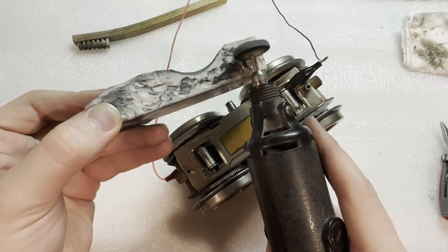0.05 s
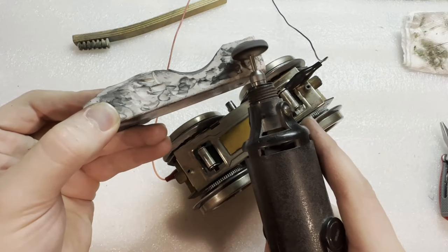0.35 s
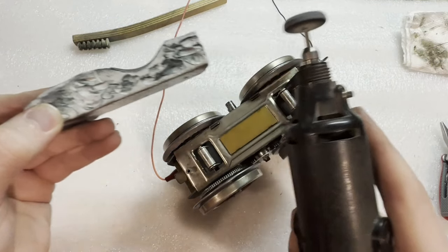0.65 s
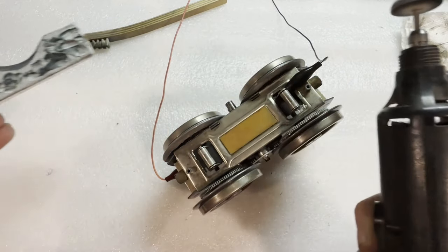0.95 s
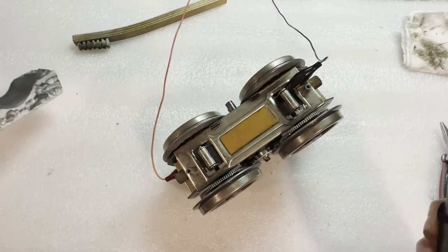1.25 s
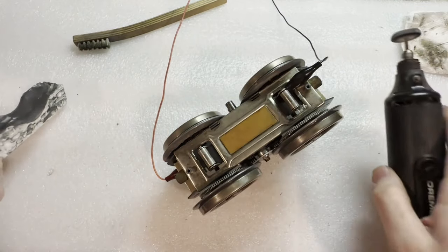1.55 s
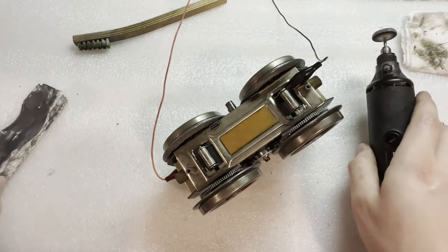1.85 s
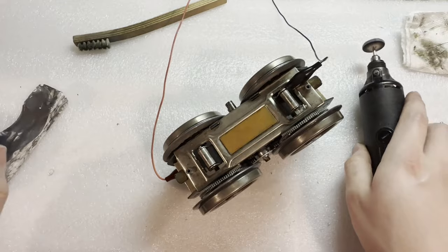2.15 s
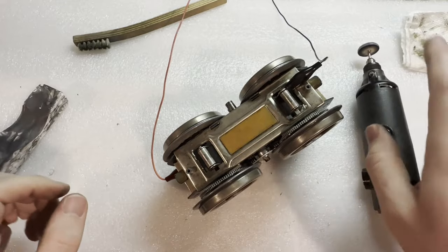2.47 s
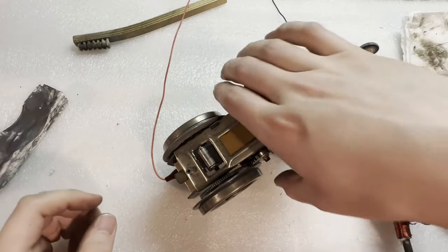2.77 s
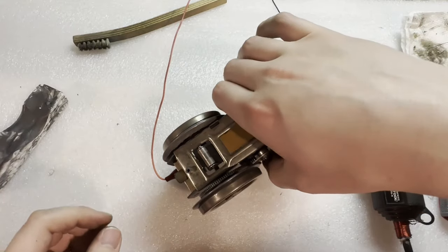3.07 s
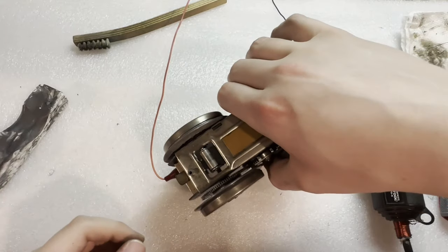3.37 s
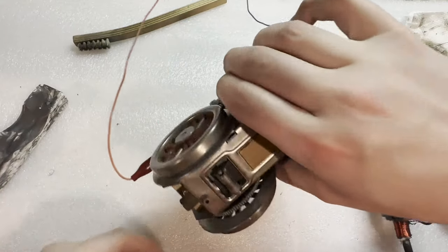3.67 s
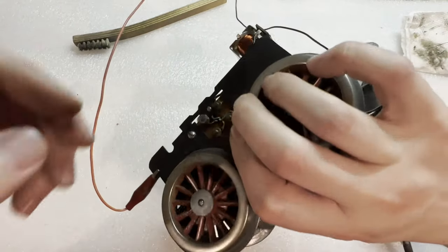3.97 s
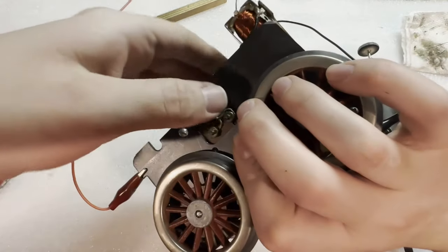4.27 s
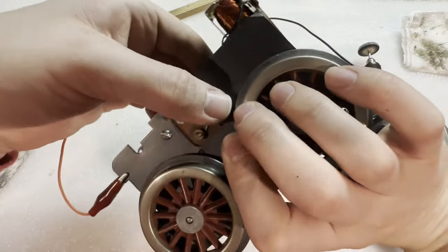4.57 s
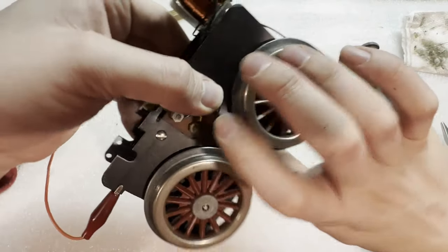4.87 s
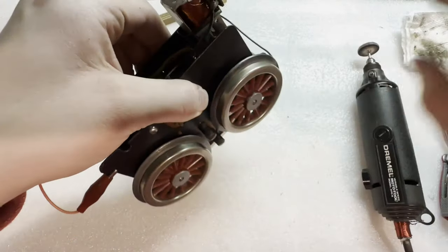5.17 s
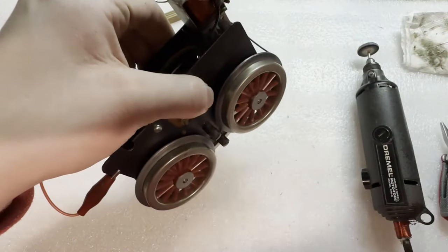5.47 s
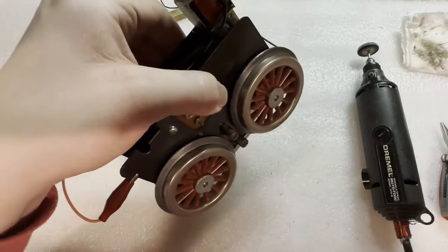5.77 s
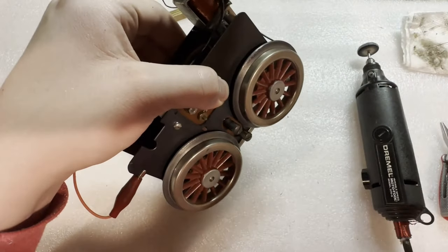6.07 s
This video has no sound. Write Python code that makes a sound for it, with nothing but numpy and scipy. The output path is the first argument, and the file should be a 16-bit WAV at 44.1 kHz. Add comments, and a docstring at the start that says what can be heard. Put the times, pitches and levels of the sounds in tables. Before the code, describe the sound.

A rotary tool buffs a part with a rattling, hissing whine, rising in pitch at 0.4 seconds as it lifts free. It is switched off at 0.6 seconds and winds down by about 1.3, with a sharp click at 0.7 and a hollow plastic clack at 0.9. The tool bumps the bench lightly at 1.4 seconds, is laid down at 1.8 and drags faintly over foam. From 2.7 seconds a metal model chassis slides softly, with a flurry of small clicks around 3.3, then quiet finger rubs, tiny squeaks and ticks. At 4.8 and 4.9 seconds its wheels and rods snap sharply, the loudest moments, leaving a thin, brief ping. A flicked wheel hisses faintly just after 5 seconds. Dull wooden knocks follow, the strongest at 5.8, and a last click comes at 6.1. Everything is close, in a small room with faint air and a thin electrical whistle.

```python
"""A foam-covered workbench in a small room, one close microphone. A rotary tool buffs a part, races as
the wheel lifts free, is switched off and coasts to rest: a shock each turn gives harmonics, fan and
armature add tones, brushes and wheel hiss. Its shell clacks and it is laid down. A metal model chassis
is slid, lifted and turned (stick-slip noise); its wheels and rods click and snap (struck modes), and
one wheel is flicked. A few dull wooden knocks sound over room air and a thin electrical whistle."""
import sys
import numpy as np
from scipy import signal
from scipy.fft import rfft, irfft
from scipy.io import wavfile

SR = 44100
rng = np.random.default_rng(int(sys.argv[2]) if len(sys.argv) > 2 else 0)


def wrap_up_sound(samples):
    """Save the sound to the file named by the first command line argument, as 16-bit audio."""
    columns = np.atleast_2d(samples).T
    # keep every value between -1 and 1, then stretch to whole-number steps
    tamed = np.clip(columns, -1, 1)
    steps = np.round(tamed * 32767).astype(np.int16)
    wavfile.write(sys.argv[1], SR, steps)


N = 274302
TIME_S = np.arange(N) / SR
AFTER_S = TIME_S[:SR // 2]   # time since a blow
BINS_HZ = np.arange(N // 2 + 1) * SR / N
CUTOFF_HZ = 15900


def from_db(db):
    return 10 ** (np.asarray(db) / 20)


def unit_rms(x):
    return x / np.sqrt(np.mean(x ** 2) + 1e-20)


def spectrum_db(points, hz):
    """Spectrum level, interpolated over log frequency."""
    points_hz, db = np.transpose(points)
    return np.interp(np.log(np.maximum(hz, 1)), np.log(points_hz), db)


def swell_db(resonances, hz):
    """Summed gain of bell-shaped resonances."""
    return sum(db / (1 + (2 * (hz - centre_hz) / width_hz) ** 2)
               for centre_hz, width_hz, db in resonances)


def colour(x, spectrum, resonances=()):
    """Shape by a spectrum plus resonances; rms 1."""
    gain = from_db(spectrum_db(spectrum, BINS_HZ) + swell_db(resonances, BINS_HZ))
    return unit_rms(irfft(rfft(x) * gain, N))


def butter(x, hz, kind, order=2):
    """Causal low- or high-pass."""
    sections = signal.butter(order, np.clip(hz, 10, .45 * SR), kind, fs=SR, output="sos")
    return signal.sosfilt(sections, x)


def drift(hz):
    """Low-passed random wander; rms 1."""
    return unit_rms(butter(rng.standard_normal(N + SR), hz, "low")[SR:])


def resonate(x, hz, width_hz):
    """Two-pole resonator."""
    r = np.exp(-np.pi * width_hz / SR)
    return signal.lfilter([1, 0, -1], [1, -(1 + r * r) * np.cos(2 * np.pi * hz / SR), r * r], x)


def narrow_band(x, hz, width_hz):
    """Two equal resonators in series; rms 1."""
    return unit_rms(resonate(resonate(x, hz, width_hz), hz, width_hz))


def dying_noise(t60_s):
    """Decaying noise burst; energy 1."""
    x = rng.standard_normal(len(AFTER_S)) * from_db(-60 * AFTER_S / t60_s)
    return x / np.sqrt(np.sum(x ** 2))


def contact(chatter_db, t60_s):
    """One sharp push, then brief surface chatter."""
    return (AFTER_S == 0) + from_db(chatter_db) * dying_noise(t60_s)


def struck(modes, push, vary_db=1.0):
    """Damped modes; each blow divides a little differently among them."""
    ring = np.zeros(len(AFTER_S))
    for k, (hz, db, t60_s) in enumerate(modes):
        envelope = from_db(db + vary_db * rng.standard_normal() - 60 * AFTER_S / t60_s)
        ring += (-1) ** k * envelope * np.sin(2 * np.pi * hz * AFTER_S)
    return signal.fftconvolve(push, ring)[:len(AFTER_S)]


def place(out, start_s, peak_db, sound):
    """Add a blow at its time and peak level."""
    start = int(start_s * SR)
    out[start:start + len(sound)] += (from_db(peak_db) * sound / np.abs(sound).max())[:N - start]


def in_room(x, wet_db, wall_hz, t60_s=.21):
    """Direct sound plus a short, duller tail from bench and walls."""
    tail = butter(dying_noise(t60_s) * (AFTER_S > .003), wall_hz, "low", order=1)
    return x + from_db(wet_db) * signal.fftconvolve(x, tail)[:N]


def thuds(blows, clusters, chatter_db=3.0):
    """Blows ring clusters of close modes; soft contacts lose treble, glancing ones bass."""
    out = np.zeros(N)
    for start_s, peak_db, lowpass_hz, highpass_hz in blows:
        ring = np.zeros(len(AFTER_S))
        for hz, width_hz, share_db, t60_s in clusters:
            cluster = resonate(contact(chatter_db, t60_s), hz, width_hz)
            ring += from_db(share_db) * unit_rms(resonate(cluster, hz, width_hz=hz))
        softened = butter(butter(ring, lowpass_hz, "low", order=1), 3 * lowpass_hz, "low")
        place(out, start_s, peak_db, butter(softened, highpass_hz, "high"))
    return out


def friction(strokes, spectrum, attack_s, release_s, grain_db, grain_hz, resonances=(), treble_hz=7000):
    """Clumps of tiny slips stir any resonances; a stroke takes hold, grows or fades, then dies away."""
    slips = colour(rng.standard_normal(N) * from_db(grain_db * drift(grain_hz) + drift(21)), spectrum)
    ringing = np.zeros(N)
    for peak in resonances:
        excess = from_db(swell_db([peak], BINS_HZ)) - 1
        ringing += irfft(rfft(slips) * excess, N) * from_db(3 * drift(9))
    rub = unit_rms(slips + ringing)
    body = irfft(rfft(rub) / (1 + (BINS_HZ / treble_hz) ** 4), N)
    out = np.zeros(N)
    for start_s, length_s, db, growth_db, treble_db in strokes:
        age_s = TIME_S - start_s
        pressure = from_db(db + growth_db * (np.clip(age_s / length_s, 0, 1) - .5))
        envelope = np.clip(age_s / attack_s, 0, 1) * np.exp(-np.maximum(age_s - length_s, 0) / release_s)
        texture = body + from_db(treble_db) * (rub - body)
        out += pressure * envelope * np.roll(texture, rng.integers(N))
    return out


# room air: f/Hz, density/dB
AIR_SPECTRUM = [(15, -62.5), (25, -37), (82, -3.5), (166, -16), (236, -6.5), (285, -12.5), (317, -18),
                (624, -23), (677, -21), (863, -25), (988, -23), (5730, -28), (7710, -33.5), (9070, -31.5),
                (16000, -45)]


def background(air_db=-72, whistle_db=-81, throb_hz=60):
    """Room air and a thin, throbbing electrical whistle."""
    throb = (1 + np.cos(2 * np.pi * throb_hz * TIME_S)) ** 2 + .4
    whistle = narrow_band(throb * rng.standard_normal(N), hz=7830, width_hz=400)
    air = colour(rng.standard_normal(N), AIR_SPECTRUM)
    return from_db(air_db) * air + from_db(whistle_db) * whistle


# rumble: t/s, length/s, level/dB, growth/dB, treble/dB
RUMBLE_STROKES = [(5.0, 1.5, -68, -3.5, -4)]
# rumble: f/Hz, density/dB
RUMBLE_SPECTRUM = [(50, -20), (100, -3.5), (250, 4.5), (500, -10), (900, -10), (1800, -11), (5000, -72)]


def rumble():
    """Soft, uneven low noise while the chassis is held up."""
    return friction(RUMBLE_STROKES, RUMBLE_SPECTRUM, attack_s=.024, release_s=.1, grain_db=4, grain_hz=60)


# knocks: t/s, peak/dB, low-pass/Hz, high-pass/Hz
KNOCKS = [(2.374, -47, 700, 850), (3.859, -51, 1520, 328), (5.099, -54.5, 1500, 700),
          (5.306, -44.5, 710, 200), (5.416, -46, 695, 397), (5.478, -36.5, 2520, 604),
          (5.493, -41.5, 2485, 690), (5.654, -49.5, 350, 120), (5.744, -53.5, 409, 150),
          (5.791, -38, 700, 500), (5.8, -26, 2000, 350), (5.805, -28, 500, 150), (5.822, -34, 1620, 150),
          (5.868, -47.5, 500, 298), (5.895, -47.5, 406, 150), (5.965, -53, 593, 150),
          (6.063, -53.5, 500, 150), (6.175, -56.5, 903, 150)]
# wood mode clusters: f/Hz, width/Hz, level/dB, t60/s
WOOD_CLUSTERS = [(84, 72, -5.5, 0.1), (265, 32, 4.5, 0.046), (364, 48, -1.5, 0.048), (469, 68, 0.5, 0.033),
                 (690, 120, -8.5, 0.055), (880, 59, -2.5, 0.054), (1244, 510, -2.5, 0.063),
                 (2000, 2500, -11, 0.23), (3320, 12000, -3, 0.19)]


def wood_knocks():
    """Struck wood rings dully into the room."""
    return in_room(thuds(KNOCKS, WOOD_CLUSTERS), wet_db=-1.5, wall_hz=4000)


# bumps: t/s, peak/dB, low-pass/Hz, high-pass/Hz
BUMPS = [(1.384, -43.5, 3030, 203), (1.392, -50, 198, 40), (1.7685, -25, 3500, 256),
         (1.777, -27.5, 300, 40), (1.792, -38, 2000, 100), (1.826, -35.5, 690, 90), (1.85, -34.5, 2000, 70),
         (2.572, -47, 1210, 433), (2.579, -49, 200, 60), (4.67, -41.5, 1000, 89), (4.689, -48, 700, 100)]
# bench mode clusters: f/Hz, width/Hz, level/dB, t60/s
BENCH_CLUSTERS = [(72.4, 44, 0, 0.24), (117, 41, 3.5, 0.069), (193, 42, -1.5, 0.093),
                  (244, 26, -2.5, 0.067), (350, 126, -1, 0.02), (855, 190, -1, 0.015),
                  (1210, 210, 0, 0.0383), (1900, 2200, 0, 0.076), (3500, 2600, -5.5, 0.095)]


def bench_bumps():
    """Tool and hands bump the bench and ring its modes."""
    return in_room(thuds(BUMPS, BENCH_CLUSTERS), wet_db=-5.5, wall_hz=5000)


# drags: t/s, length/s, level/dB, growth/dB, treble/dB
DRAGS = [(1.26, 0.12, -67.5, 7, -1.5), (1.385, 0.12, -69.5, -13, 2), (1.56, 0.068, -65.5, -1, -5),
         (1.63, 0.12, -59, -0.5, -6.5), (1.765, 0.22, -61, -14, 1.5), (1.985, 0.043, -69, 10.5, 17),
         (2.05, 0.17, -56, 9, 0.5), (2.24, 0.14, -66.5, -0.5, -2.5), (2.42, 0.21, -78, -5, 0.5),
         (4.395, 0.032, -56.5, -1, -24)]
# plastic on foam: f/Hz, density/dB
PLASTIC_SPECTRUM = [(500, -18), (1500, -4), (2800, 3.5), (5000, 0), (7500, -1), (9800, 3), (12000, -5),
                    (15500, -1.5)]


def tool_drag():
    """The plastic tool, its cord and loose wires drag over the foam."""
    return friction(DRAGS, PLASTIC_SPECTRUM, attack_s=.0032, release_s=.014, grain_db=1.5, grain_hz=500)


# rubs: t/s, length/s, level/dB, growth/dB, treble/dB
RUBS = [(1.63, 0.096, -61, 0, -21), (3.32, 0.12, -59, -12, -12), (3.42, 0.52, -77.5, 12.5, 1),
        (3.97, 0.01, -58.5, 3, -10), (4.28, 0.98, -83, -13, -3.5), (4.61, 0.11, -65.5, 13.5, 2),
        (4.73, 0.15, -59.5, 10, -3), (4.95, 0.6, -67.5, 3, 1), (5.48, 0.6, -77.5, -15.5, 5)]
# skin friction: f/Hz, density/dB
FINGER_SPECTRUM = [(150, -5.5), (500, -7), (1000, -2), (1500, -3), (1950, -2), (2300, -0.5), (2800, -15),
                   (4500, -12.5), (8000, -11), (15000, -21)]


def finger_rubs():
    """Fingers rub on metal and plastic."""
    return friction(RUBS, FINGER_SPECTRUM, attack_s=.019, release_s=.017, grain_db=2, grain_hz=150)


# squeaks: centre t/s, level/dB, f/Hz, length/s
SQUEAKS = [(2.174, -54, 2900, 0.013), (2.22, -59, 2000, 0.033), (3.632, -56.5, 3840, 0.03),
           (3.746, -64.5, 1800, 0.066), (3.841, -51, 1900, 0.011), (3.864, -68, 1210, 0.032),
           (4.304, -57, 2000, 0.03), (4.652, -52, 2000, 0.052), (4.68, -63, 9800, 0.029),
           (5.443, -58, 2520, 0.0088)]


def finger_squeaks():
    """Skin sticks and slips unevenly around one pitch."""
    out = np.zeros(N)
    for centre_s, db, hz, length_s in SQUEAKS:
        slips = narrow_band(rng.standard_normal(N), hz, width_hz=.26 * hz)
        out += from_db(db) * slips * np.exp(-(2 * (TIME_S - centre_s) / length_s) ** 2)
    return out


# slides: t/s, length/s, level/dB, growth/dB, treble/dB
SLIDES = [(2.725, 0.11, -59.5, -6.5, 0), (2.835, 0.3, -55, 0.5, -3.5), (3.14, 0.18, -54.5, 2, -0.5),
          (3.395, 0.018, -55.5, 5, -2.5), (3.553, 0.012, -62.5, 2.5, -6), (3.61, 0.026, -62.5, 14.5, 1),
          (4.286, 0.018, -53, -5, -6)]
# chassis on foam: f/Hz, density/dB
FOAM_SPECTRUM = [(60, -23), (240, -6), (400, -17), (700, -24), (1150, -10), (1600, -12.5), (3200, -11.5),
                 (5200, -10.5), (9000, -10), (12000, -13), (16000, -20)]
# sliding chassis: f/Hz, width/Hz, gain/dB
SLIDE_RESONANCES = [(2060, 200, 4), (2690, 200, 7), (4330, 900, 10), (5740, 250, 2), (7980, 260, 5.5),
                    (10200, 150, 4)]


def chassis_slide():
    """The chassis sings a little as it slides over foam and through the hands."""
    return friction(SLIDES, FOAM_SPECTRUM, attack_s=.018, release_s=.022, grain_db=3.2, grain_hz=800,
                    resonances=SLIDE_RESONANCES)


# spin: t/s, length/s, level/dB, growth/dB, treble/dB
SPINS = [(5.04, 0.23, -62.5, 3.5, -1.5)]
# axle hiss: f/Hz, density/dB
AXLE_SPECTRUM = [(500, 0.5), (2100, -9), (3200, -8), (6000, -19), (8500, 1), (13000, -4), (16000, -22)]
# spinning wheel: f/Hz, width/Hz, gain/dB
RIM_RESONANCES = [(2110, 380, 20)]


def flicked_wheel():
    """A model wheel spins: its axle hisses, its rim rings."""
    return friction(SPINS, AXLE_SPECTRUM, attack_s=.039, release_s=.13, grain_db=-2, grain_hz=150,
                    resonances=RIM_RESONANCES)


# light clicks: t/s, peak/dB, f/Hz, width/Hz, chatter t60/s
TICKS = [(.715, -22, 5200, 600, 0.0081), (.716, -16, 8250, 2600, 0.0059), (1.2085, -47, 3830, 4000, 0.017),
         (1.386, -30.5, 4000, 8900, 0.04), (1.397, -35, 4000, 9000, 0.018), (1.765, -47, 2000, 4000, .01),
         (1.769, -32.5, 2510, 9000, 0.04), (2.954, -39, 4180, 3500, 0.0094),
         (3.177, -38, 5000, 5000, 0.013), (3.254, -41.5, 5300, 2500, .012), (3.277, -37, 5000, 7000, 0.014),
         (3.3157, -34, 4340, 8000, 0.025), (3.3222, -27, 4000, 7000, 0.013),
         (3.3345, -35.5, 2600, 3000, 0.014), (3.34, -40.5, 1900, 1400, .009),
         (3.3473, -31.5, 1820, 1480, 0.006), (3.36, -46, 3800, 3500, 0.0077),
         (3.364, -28.5, 4000, 1590, 0.015), (3.3646, -33, 9700, 4000, 0.0084),
         (3.3703, -30, 2950, 2660, 0.011), (3.715, -51, 2000, 1490, 0.021),
         (3.842, -39.5, 1900, 900, 0.0094), (3.89, -56, 3000, 4000, .008), (3.974, -34, 10600, 5500, 0.013),
         (3.9738, -46, 1900, 2500, .009), (3.988, -49, 1600, 2000, .008),
         (3.9963, -37.5, 10500, 5470, 0.011), (3.997, -47.5, 1700, 2500, .009),
         (4.669, -43, 1650, 1505, 0.011), (4.674, -46, 1900, 900, 0.0067), (4.6882, -47, 1900, 901, .009),
         (4.737, -37, 2100, 549, 0.0065), (4.771, -45.5, 8000, 5000, .01), (5.48, -39.5, 4000, 8000, 0.082),
         (5.7982, -38, 3000, 3500, .013), (5.802, -35, 3500, 6000, .012), (5.805, -39.5, 7500, 6100, 0.026),
         (5.813, -34.5, 5970, 5860, 0.025), (6.1197, -31.5, 4430, 1800, 0.0054),
         (6.1206, -34, 9500, 5000, 0.013)]


def ticks(jolt_db=-11):
    """Switch, clips and rods touch and hardly ring; each click jolts the part that carries it."""
    out = np.zeros(N)
    for start_s, peak_db, hz, width_hz, t60_s in TICKS:
        push = contact(chatter_db=7, t60_s=t60_s)
        tick = butter(resonate(push, hz, width_hz), .19 * hz, "high")
        tick = butter(tick, hz + 2.2 * width_hz, "low")
        jolt = resonate(push, hz=1212, width_hz=2300)
        place(out, start_s, peak_db, unit_rms(tick) + from_db(jolt_db) * unit_rms(jolt))
    return in_room(out, wet_db=-5.5, wall_hz=7000)


# steel wheel: f/Hz, level/dB, t60/s
STEEL_MODES = [(2010, -10, .13), (4470, -3, 0.11), (5800, -7, .08), (8786, -14, 0.13), (9808, -14, 0.13),
               (13900, -4.5, .1), (13930, -4, .1)]


def wheel_ping():
    """A steel wheel rings on, thin and bright, after the hardest snap."""
    out = np.zeros(N)
    place(out, start_s=4.886, peak_db=-37, sound=struck(STEEL_MODES, AFTER_S == 0))
    return out


# snaps: t/s, peak/dB, high-pass/Hz
SNAPS = [(4.796, -13.5, 260), (4.8062, -25, 1820), (4.821, -36.5, 800), (4.8777, -9, 1140),
         (4.8826, -19.5, 2200), (4.889, -22, 1710)]
# hand-damped chassis: f/Hz, level/dB, t60/s
CHASSIS_MODES = [(479, -18.5, .016), (700, -13, 0.018), (1000, -5, 0.0075), (1296, -2.5, 0.008),
                 (2175, 1.5, 0.011), (2424, 1, 0.005), (3260, -5.5, .008), (4585, 1.5, 0.01),
                 (4940, -0.5, 0.011), (5500, -3.5, .007), (6080, -7.5, .008), (7510, -16.5, .012),
                 (9920, -21, .015), (10520, -21.5, .017)]


def chassis_snaps(crack_db=-6.5):
    """Wheels and rods snap against the frame as axle play is taken up."""
    out = np.zeros(N)
    for start_s, peak_db, highpass_hz in SNAPS:
        ring = struck(CHASSIS_MODES, contact(chatter_db=-38, t60_s=.031))
        crack = resonate(dying_noise(t60_s=.035), hz=2500, width_hz=4970)
        snap = unit_rms(ring) + from_db(crack_db) * unit_rms(crack)
        place(out, start_s, peak_db, butter(snap, highpass_hz, "high", order=1))
    return in_room(out, wet_db=-15.5, wall_hz=7000)


# tool shell: f/Hz, level/dB, t60/s
SHELL_MODES = [(1038, -7, 0.034), (2250, -9, 0.0043), (3270, 0, 0.009), (3950, -1, 0.005), (4600, 1, 0.005),
               (5300, -3, 0.005), (6500, -9, 0.0054), (7500, -3, .007), (8500, 2, 0.0035),
               (11000, -11, .003)]


def shell_clack(crack_db=-1):
    """The grip shifts; the plastic shell clacks with a short, hollow ring."""
    out = np.zeros(N)
    ring = struck(SHELL_MODES, contact(chatter_db=-2, t60_s=.0051))
    crack = resonate(dying_noise(t60_s=.031), hz=4300, width_hz=7000)
    place(out, start_s=.9385, peak_db=-17.5, sound=unit_rms(ring) + from_db(crack_db) * unit_rms(crack))
    return in_room(out, wet_db=-14, wall_hz=5000)


LOADED_HZ, FREE_HZ = 111.07, 133.7   # spindle speed on and off the work
LIFT_S, OFF_S = .424, .581
FAN_BLADES, ARMATURE_ORDER = 10, 32


def spindle(lift_ease_s=.0225, off_ease_s=.012, brake_hz_per_s=191):
    """Races when lifted, brakes evenly by friction once off; returns freedom (0-1), speed, turns."""
    free = .5 + .5 * np.tanh((TIME_S - LIFT_S) / (2 * lift_ease_s))
    coasting_s = off_ease_s * np.logaddexp(0, (TIME_S - OFF_S) / off_ease_s)
    speed_hz = np.maximum(LOADED_HZ + (FREE_HZ - LOADED_HZ) * free - brake_hz_per_s * coasting_s, 0)
    bearing_play = .0011 * (1 - .5 * free) * drift(120)   # blurs the highest overtones
    wobble = (.0016 * (1 - free) + .0006 * free) * drift(23.3)
    turns = np.cumsum(speed_hz * (1 + wobble)) / SR + bearing_play
    return free, speed_hz, turns


def effort(free, speed_hz, loaded_db, free_db, db_per_octave, full_hz=FREE_HZ):
    """Layer gain: crossfades from loaded to free, falls as the speed drops below full_hz."""
    power = (1 - free) * from_db(loaded_db) ** 2 + free * from_db(free_db) ** 2
    octaves = np.log2(np.clip(speed_hz / full_hz, 1e-6, 1))
    return np.sqrt(power) * from_db(db_per_octave * octaves)


# tool housing resonances: f/Hz, width/Hz, gain/dB
HOUSING = [(1040, 210, 1.5), (3400, 440, 10), (5700, 200, 7), (6400, 220, 7), (7200, 260, 9),
           (8200, 300, 3)]


def harmonics(strong, weak, turns, speed_hz, usual_hz, flutter_db, smear_rad_per_khz, ring_turns=.55):
    """A shock rings through every turn; its overtones glide through the housing's resonances."""
    running = np.count_nonzero(speed_hz)
    samples = np.arange(running)
    knots = np.linspace(0, running - 1, 80).astype(int)
    knot_hz = speed_hz[knots]
    slowing = np.maximum(1 - knot_hz / usual_hz, 0)
    shock = rng.standard_normal(512) * np.exp(-np.linspace(0, 1, 512) / ring_turns)
    phases = np.angle(rfft(shock))
    strong_db = {round(k): db for k, db in strong}
    out = np.zeros(N)
    for k in range(1, int(CUTOFF_HZ / usual_hz)):
        if k in (FAN_BLADES, ARMATURE_ORDER):   # these have tones of their own
            continue
        db = strong_db.get(k, spectrum_db(weak, k * usual_hz) + 2.2 * rng.standard_normal())
        db = db + swell_db(HOUSING, k * knot_hz) - swell_db(HOUSING, k * usual_hz)
        db += flutter_db * rng.standard_normal(len(knots))
        db -= .7 * k * slowing   # slower shocks are softer
        smear = smear_rad_per_khz * k * knot_hz / 1000 * rng.standard_normal(len(knots))   # uneven contact
        phase = phases[k] + np.interp(samples, knots, smear)
        amplitude = np.interp(samples, knots, from_db(db))
        out[:running] += amplitude * np.cos(2 * np.pi * k * turns[:running] + phase)
    return np.sqrt(2) * out


# air vent resonance: f/Hz, width/Hz, gain/dB
VENTS = [(1024, 350, 22)]


def motor_tones(free, speed_hz, turns):
    """Fan tone and armature whine swell as they pass the vent and housing resonances."""
    def tone(order, resonances):
        swell = from_db(swell_db(resonances, order * speed_hz))
        return swell * np.sqrt(2) * np.sin(2 * np.pi * order * turns)

    fan_gain = effort(free, speed_hz, loaded_db=-57.5, free_db=-52.5, db_per_octave=25.4)
    whine_gain = effort(free, speed_hz, loaded_db=-49, free_db=-51, db_per_octave=17)
    return fan_gain * tone(FAN_BLADES, VENTS) + whine_gain * tone(ARMATURE_ORDER, HOUSING)


# motor brushes: f/Hz, density/dB
BRUSH_SPECTRUM = [(300, -15), (550, -36), (1000, 8), (1500, 0), (2200, 3), (2700, 6), (4300, -0.5),
                  (4900, 4.5), (6500, 1), (8500, 2.5), (10000, 0), (12500, -10), (14500, -8), (16000, -22)]
# buffing wheel: f/Hz, density/dB
BUFFING_SPECTRUM = [(45, -41), (90, -7.5), (300, -6.5), (700, -4), (950, 6.5), (1400, -8), (2000, -1.5),
                    (2900, -17.5), (3800, -0.5), (5000, -10.5), (12000, -8)]


def tool_hiss(free, speed_hz, turns, segments=5, spark_db=2.5, smooth_db=-4.5, smooth_s=.05):
    """Brushes and wheel hiss; contact pressure jumps once a turn and swells per commutator segment."""
    shaking = np.clip(speed_hz / LOADED_HZ, 0, 1) ** 4
    bite = from_db(2.5 * drift(60)) * np.exp(-(turns % 1) / .35)
    commutator = .25 * np.cos(2 * np.pi * segments * turns)
    pressure = 1 + shaking * ((1 - .6 * free) * (1.4 * bite - .5) + commutator)
    sparking = rng.standard_normal(N) * pressure * from_db(spark_db * drift(1700))
    brushes = colour(sparking, BRUSH_SPECTRUM, HOUSING)
    brushes *= effort(free, speed_hz, loaded_db=-50.5, free_db=-44, db_per_octave=9, full_hz=100)
    wheel = colour(rng.standard_normal(N) * pressure, BUFFING_SPECTRUM, HOUSING)
    wheel *= effort(free, speed_hz, loaded_db=-39, free_db=-36, db_per_octave=18.8)
    powered = .5 - .5 * np.tanh((TIME_S - OFF_S) / smooth_s - 1)
    return from_db(smooth_db * free * powered) * (brushes + wheel)   # smoothest when free under power


# strong harmonics, on the work: order, level/dB
LOADED_STRONG = [(6, -59), (8, -53), (9, -53), (13, -63), (14, -59), (15, -56), (16, -49), (17, -53),
                 (18, -56), (19, -56), (20, -56), (21, -54), (22, -51.5), (23, -52), (24, -50.5), (28, -53),
                 (29, -56), (30, -55), (31, -54), (33, -49), (34, -54), (35, -54), (36, -54), (37, -57),
                 (39, -55), (40, -55), (41, -55), (42, -54), (47, -58), (48, -58), (49, -59), (50, -57),
                 (51, -58), (52, -57)]
# weak harmonics, on the work: f/Hz, level/dB
LOADED_WEAK = [(110, -78), (600, -63), (1400, -65.5), (2200, -58), (3000, -68), (4200, -59.5), (5000, -63),
               (6700, -61), (8200, -63), (8900, -69), (9900, -63), (12500, -64), (14500, -67), (16000, -70)]
# strong harmonics, running free: order, level/dB
FREE_STRONG = [(1, -61), (15, -54), (16, -50), (17, -54), (19, -56), (20, -54), (22, -57), (23, -53),
               (24, -56), (25, -52), (28, -52), (30, -56), (33, -50), (34, -57), (35, -56), (41, -54),
               (42, -46.5), (45, -53), (46, -53), (48, -52.5), (50, -50.5), (52, -48.5), (53, -54),
               (54, -55), (57, -57), (64, -57), (68, -55), (73, -56), (84, -60), (91, -60)]
# weak harmonics, running free: f/Hz, level/dB
FREE_WEAK = [(130, -65), (270, -70), (500, -65), (700, -56), (1100, -62), (1500, -66), (2200, -56),
             (4500, -63), (5000, -65), (6000, -68), (7000, -65), (7800, -62), (10000, -64), (12500, -67),
             (14300, -58), (16000, -71)]


def rotary_tool():
    """The loaded rattle gives way to a free-running buzz; every layer follows the spindle."""
    free, speed_hz, turns = spindle()
    rattle = harmonics(LOADED_STRONG, LOADED_WEAK, turns, speed_hz, LOADED_HZ,
                       flutter_db=2.8, smear_rad_per_khz=.08)
    rattle *= effort(free, speed_hz, loaded_db=-.3, free_db=-15, db_per_octave=16, full_hz=LOADED_HZ)
    buzz = harmonics(FREE_STRONG, FREE_WEAK, turns, speed_hz, FREE_HZ,
                     flutter_db=1.8, smear_rad_per_khz=.02)
    buzz *= effort(free, speed_hz, loaded_db=-17, free_db=-1, db_per_octave=14)
    return rattle + buzz + motor_tones(free, speed_hz, turns) + tool_hiss(free, speed_hz, turns)


def scene():
    """One microphone, the same in both channels."""
    thumps = bench_bumps() + wood_knocks()
    handling = tool_drag() + chassis_slide() + finger_rubs() + finger_squeaks() + flicked_wheel()
    mono = thumps + handling + rumble() + rotary_tool()
    mono += ticks() + shell_clack() + chassis_snaps() + wheel_ping() + background()
    return np.array([mono, mono])


def record(dry):
    """The microphone drops the deep bass; the top is cut steeply."""
    top = signal.ellip(10, .2, 70, CUTOFF_HZ, fs=SR, output="sos")
    return signal.sosfilt(top, butter(dry, 44, "high", order=4))


dry = scene()
out = record(dry)
wrap_up_sound(out)
```